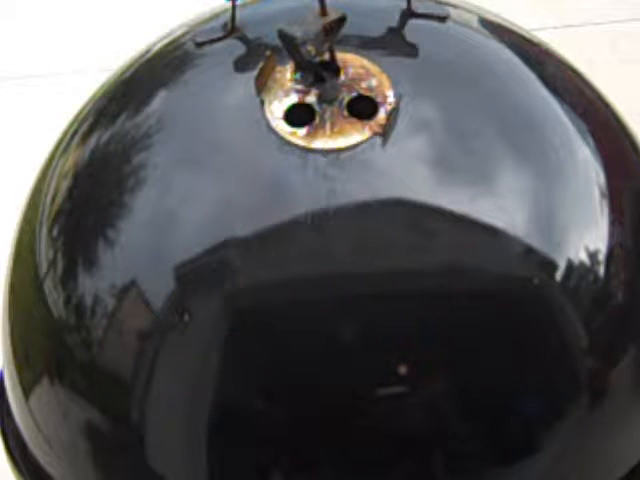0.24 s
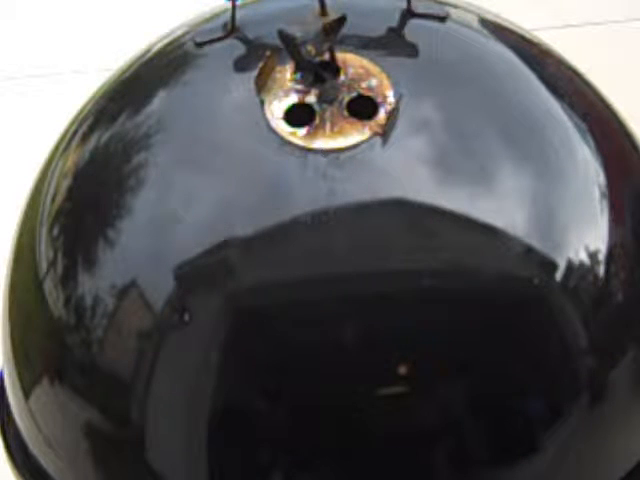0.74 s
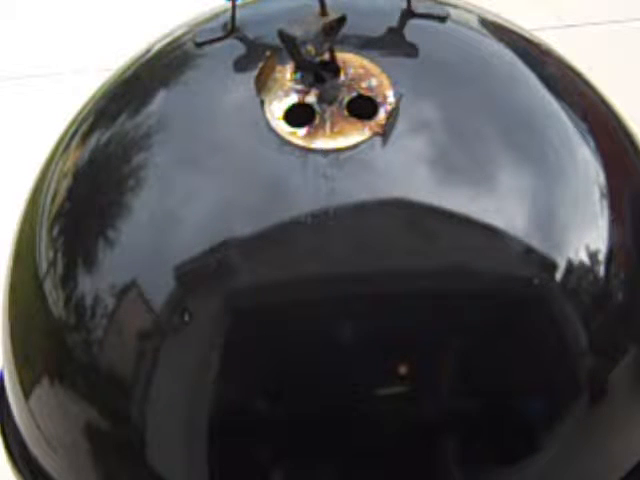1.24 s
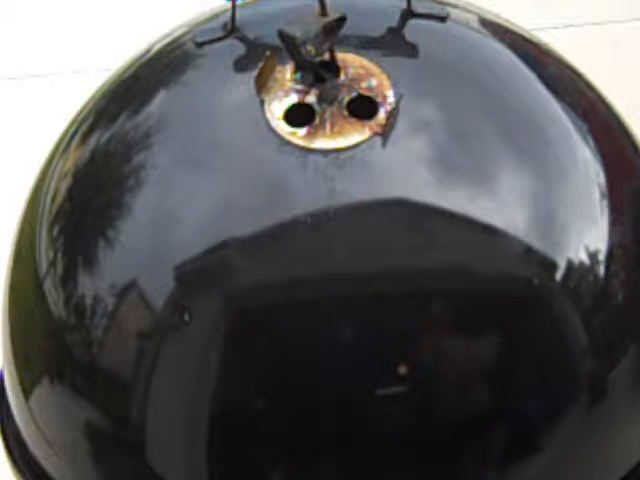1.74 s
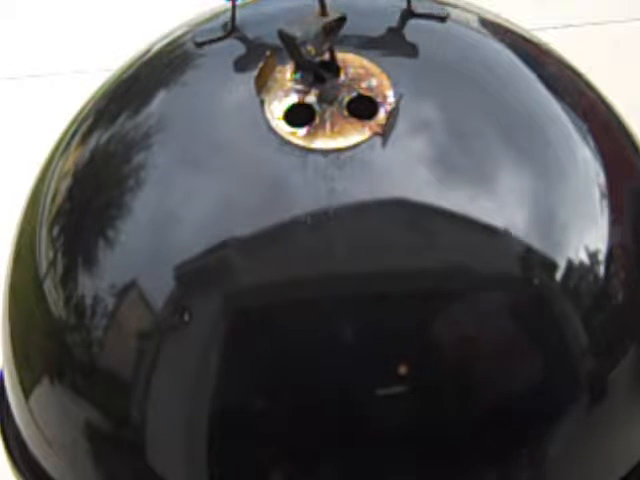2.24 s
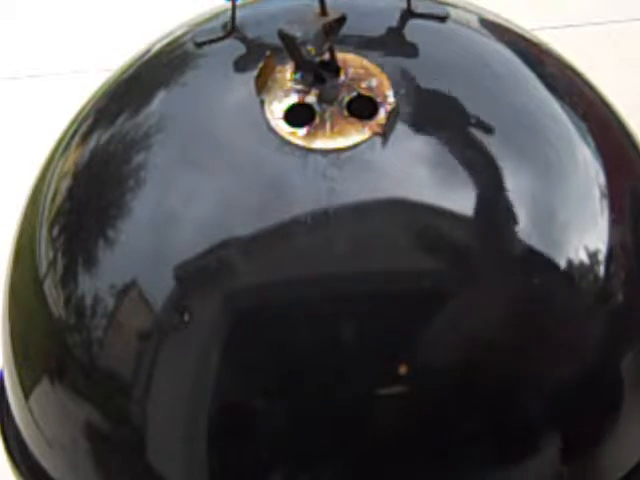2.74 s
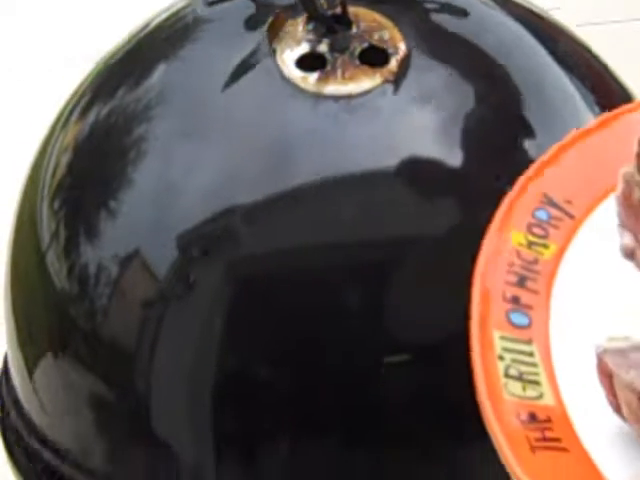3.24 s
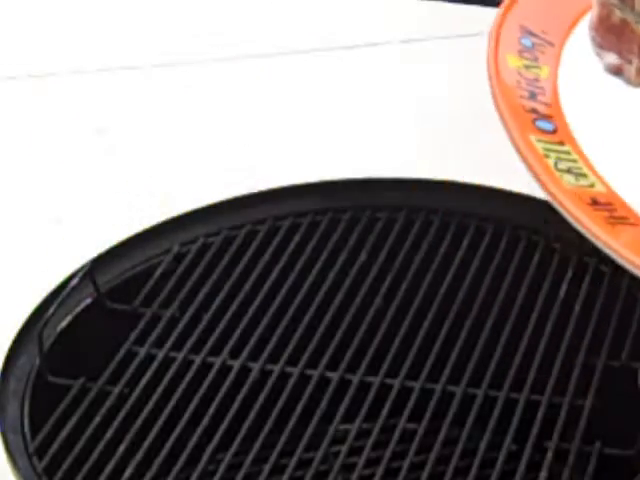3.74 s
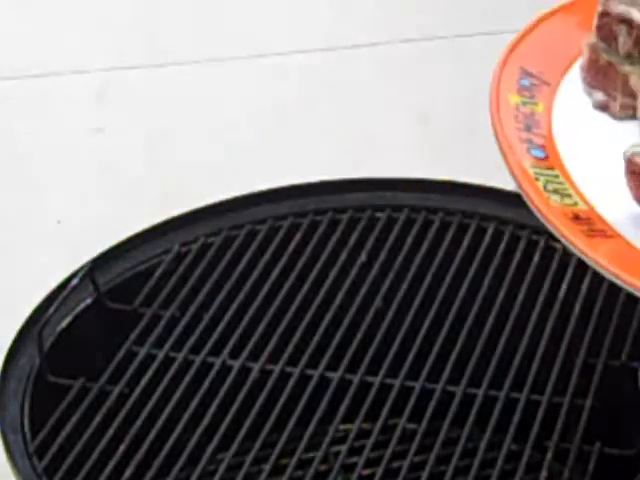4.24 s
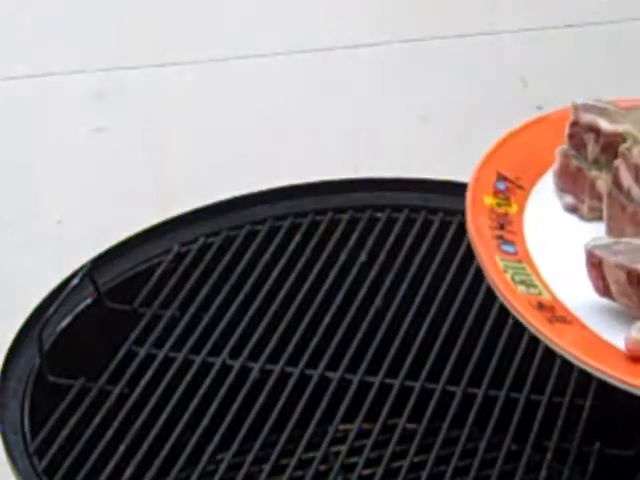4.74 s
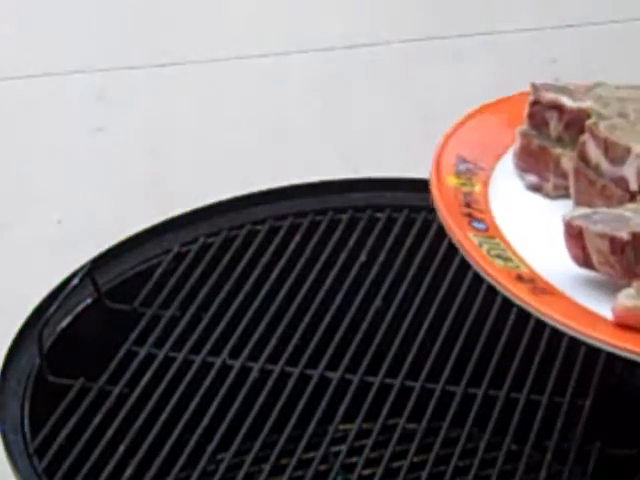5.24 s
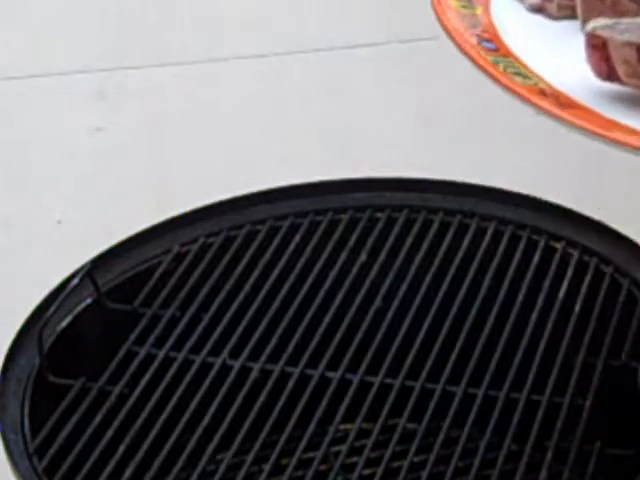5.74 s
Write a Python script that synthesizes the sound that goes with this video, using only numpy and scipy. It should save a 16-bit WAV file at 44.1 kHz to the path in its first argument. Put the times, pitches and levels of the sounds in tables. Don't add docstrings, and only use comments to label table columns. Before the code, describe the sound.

Outdoors by a kettle grill, steel tongs rattle sharply, the lid drags off and crashes on concrete, then tongs clink on a plate.

```python
import sys
import numpy as np
from scipy import signal
from scipy.fft import rfft, irfft
from scipy.io import wavfile
from scipy.ndimage import map_coordinates

SR = 44100
rng = np.random.default_rng(int(sys.argv[2]) if len(sys.argv) > 2 else 0)


def level_to_linear(level):
    exponent = np.asarray(level, float) / 20
    return 10 ** exponent


def digitize_waveform(pressure):
    field = np.atleast_2d(pressure).T
    bounded = np.clip(field, -1, 1)
    quanta = np.round(bounded * 32767).astype(np.int16)
    wavfile.write(sys.argv[1], SR, quanta)


N = 264159
CONTROL_STEP = 40

# t/s, level/dB
TRAFFIC_LEVEL = [(0.0, -46), (1.27, -47.5), (1.63, -43), (2.12, -48), (3.22, -45.5), (3.8, -43.5),
                 (3.97, -46.5), (4.17, -45), (4.37, -44), (5.07, -43.5), (5.57, -45.5), (5.99, -43)]
# f/Hz, level/dB
RUMBLE_SPECTRUM = [(12, -47), (20, -10), (59, 0.5), (120, 2), (185, -6.5), (238, -6.5), (367, -6.5),
                   (447, -33), (489, -17), (783, -21), (1250, -46), (1370, -33), (1500, -8.5),
                   (1950, -40.5), (3300, -120)]
# f/Hz, level/dB
HISS_SPECTRUM = [(290, -0.5), (500, 3), (737, 0.5), (987, 3), (1070, -3.5), (1380, -4), (3300, -7.5),
                 (5100, -12), (6500, -9.5), (8240, -10.5), (12000, -37), (12800, -35), (13800, -68)]
# f/Hz, likeness/1
AIR_LIKENESS = [(60, 0.99), (150, 0.98), (360, 0.97), (890, 0.89), (2200, 0.6), (5410, 0.51), (13300, 0.24)]
HISS_DB, HISS_TRAFFIC_SHARE = -49.5, -0.18
PASSING_S, PASSING_SPAN_S, PASSING_HZ, PASSING_OCTAVES, PASSING_DB = 4.4, 0.38, 246, 0.46, 7

# t/s, left-right level/dB, left lag/samples
POSITION = [(0, -5, 6.2), (1.0, -3.5, 4.34), (1.72, -5.5, 5.3), (1.78, -6.5, 0.16), (2.1, -0.5, 0.12),
            (2.3, 0, 0.59), (3.2, 2, 0.5), (3.9, -1, 1.7), (4.9, 0.3, 1.15), (5.4, 0, 0.69),
            (5.99, 1, 0.73)]
# f/Hz, level/dB
RIGHT_PORT_RESPONSE = [(20, 0), (7000, 0.5), (8000, -1), (8600, -9), (10000, -7.5), (12000, -13),
                       (14000, -15)]
YARD_DB, YARD_T60_S = -11.5, 0.16
OVERLOAD_PEAK = 0.65

# t/s of peak, peak level/dB, rise/s, fall/s, brightness/(dB per octave)
SCUFF_STROKES = [(0.429, -35.5, 0.066, 0.23, 0), (0.693, -31.5, 0.029, 0.18, 1.5),
                 (2.72, -51.5, 0.19, 0.29, 6), (3.155, -38, 0.011, 0.03, 5), (3.241, -49, 0.11, 0.1, 3),
                 (3.73, -38, 0.059, 0.6, 3), (3.906, -27, 0.1, 0.14, 3), (3.965, -26, 0.18, 0.073, 1),
                 (4.02, -48.5, 0.018, 0.08, -20), (4.6, -57, .35, .3, 5), (5.324, -47, 0.33, 0.13, 9),
                 (0.395, -49, 0.0055, .05, 4), (0.42, -38, .006, .03, 5.5), (0.6, -41, 0.081, .1, -0.5)]
# f/Hz, level/dB
SCUFF_SPECTRUM = [(290, -52), (500, -16), (558, -13), (700, -4.5), (1550, -6), (2120, -1), (2430, -5.5),
                  (3510, -3), (4870, -6.5), (6940, -5.5), (10600, -7), (11800, -24), (13000, -96)]
STROKE_DROP_DB, RISE_BEND, FALL_BEND = 29.5, 1.43, 1.77

# t/s, peak level/dB, f/Hz, t60/s
LOOSE_POPS = [
    (1.2, -18.5, 720, 0.003),
    (2.6, -34, 776, 0.011),
    (4.9468, -35, 3560, 0.044),
    (4.964, -33, 820, 0.089),
    (5.008, -33, 550, .08),
    (5.047, -26, 4000, .04),
    (3.9225, -18, 3600, 0.017),
    (4.9745, -20, 310, 0.051),
    (5.056, -37, 550, 0.22),
    (5.052, -35, 190, 0.17),
]
# t/s, peak level/dB, f/Hz, t60/s
CONTACT_PINGS = [(0.6845, -27, 4450, 0.057), (0.6845, -27, 2450, .05), (0.6845, -29.5, 6950, 0.074),
                 (1.792, -45, 3000, .1), (1.828, -39, 3730, .15), (1.85, -38, 5420, .2),
                 (1.868, -34, 4900, .05), (1.9732, -15, 8200, .006), (1.9785, -17, 7900, .006),
                 (4.4066, -38, 2500, 0.017), (5.581, -35, 4290, 0.035), (5.6398, -38.5, 7020, 0.34),
                 (5.6398, -23, 8200, .025), (5.6555, -35, 5600, .05), (5.8085, -32, 8700, 0.091),
                 (5.944, -34, 7300, 0.15)]

# t/s, peak level/dB, upper ring f/Hz, lower ring f/Hz, t60/s
PLATE_KNOCKS = [
    (0.676, -27, 4900, 2420, 0.11),
    (0.685, -16.5, 6840, 2350, 0.072),
    (2.674, -34.5, 4450, 3260, 0.019),
    (3.6822, -37, 6500, 5230, 0.022),
    (3.715, -29, 7050, 2900, 0.016),
    (3.8071, -14, 4950, 3170, 0.024),
    (4.4068, -31, 8300, 2470, 0.032),
]
# f/Hz, level/dB
KNOCK_CRACK_SPECTRUM = [(350, -47), (600, -67), (1320, 9), (2140, -52), (2380, 11), (4500, -1),
                        (7060, 13.5), (10200, 1.5), (12400, -32), (13800, -82)]
# f/Hz, level/dB, t60/s
PLATE_MODES = [(1364, 5.5, 0.15), (1680, 1.5, 0.15), (1920, 5, 0.15), (2010, -24, .1), (2420, -7, 0.17),
               (3145, 6.5, 0.07), (2800, -29, 0.1), (3950, -8, .15), (4450, -7, 0.05), (5100, -33, .27),
               (5800, -25, .24), (6400, -15, .41), (7050, -22, .4), (7860, -29, .5), (9100, -18, .2)]
# f/Hz, level/dB, t60/s
SINGING_MODES = [(6870, -50, .5), (6940, -40, 0.49), (8000, -41.5, 0.57), (4430, -23.5, 0.062),
                 (4000, -46, 0.45), (2400, -31, .1), (5250, -42, .3), (5700, -47, .25), (9290, -37, .25),
                 (3200, -48, .3)]
# t/s, peak level/dB
KETTLE_RIM_TICKS = [(3.701, -32), (3.7274, -36), (3.739, -35), (3.746, -35), (3.7744, -29), (3.800, -28),
                    (3.9553, -21)]
SINGING_START_S, KNOCK_CHATTER_SHARE = 0.686, 0.047
RIM_UPPER_HZ, RIM_LOWER_HZ, RIM_T60_S = 7300, 3300, 0.018

# t/s, level/dB
DRAG_LEVEL = [(3.84, -60), (3.875, -39), (3.895, -27), (3.93, -25.5), (3.97, -32), (3.995, -41),
              (4.04, -70)]
# f/Hz, width/Hz, level/dB
DRAG_RESONANCES = [(2146, 44, -0.5), (2660, 24, -0.5), (3050, 130, -3.5), (3500, 54, -1), (3800, 130, -5),
                   (4090, 62, -5), (4600, 92, -10), (5200, 130, -7), (5720, 100, -5), (6900, 120, -6.5),
                   (7300, 82, -8), (7900, 120, -5)]
# t/s, ring level/dB, thud level/dB, wash level/dB
LID_STRIKES = [
    (4.9465, -56, -15, -26.5),
    (4.9638, -56, -27, -25),
    (4.972, -22, -19.5, -15.5),
    (4.9988, -35.5, -32, -38),
    (5.051, -50, -40, -48),
]
# f/Hz, level/dB, t60/s
LID_THUD_MODES = [(134, -6.5, 0.2), (166, -6, 0.094), (197, -13, 0.23), (266, 0, 0.048), (327, -4, 0.063),
                  (440, -24, 0.07), (547, -24, 0.15), (556, -3.5, 0.082), (720, -25, 0.072),
                  (1000, -24, .08), (415, -7, 0.11), (818, -18, 0.096)]
# f/Hz, level/dB, t60/s
LID_RING_MODES = [(3530, 16, 0.056), (3716, 15.5, 0.078), (3700, -20, 0.13), (3850, 6.5, 0.18),
                  (3676, -12, 0.86), (4064, -8.5, 1.2), (4200, -10.5, 1.1), (4380, -20, .9),
                  (4700, -14, 0.63), (5040, -22, 0.88), (5260, -11, 0.41), (5960, -14, 1.1),
                  (6100, -24, 0.53), (6400, -12.5, 1.25), (6680, -24, 0.48), (7050, -18, 0.33),
                  (7569, -32, 0.67), (8060, -10, 0.21), (8460, 1, 0.23), (8850, -14, 0.34),
                  (9873, -3, 0.26), (11600, -22, 0.065)]
# f/Hz, level/dB
LID_WASH_SPECTRUM = [(530, -21), (900, -8), (1040, -21), (1170, -14.5), (2000, -11.5), (2950, -13),
                     (3310, -6), (3620, -4), (4300, 5), (4900, -13), (8050, 2.5), (9450, -5.5),
                     (13000, -5.5), (13800, -68)]
# f/Hz, t60/s
LID_WASH_DECAY = [(1000, 0.67), (2700, 0.074), (3300, 0.25), (3600, 0.69), (4200, 1.74), (4700, 1.24),
                  (7500, 0.78), (10000, 0.14), (13000, 0.21)]
PUSH_DB, PUSH_HZ, PUSH_SAG_PER_S, PUSH_T60_S = -7.5, 384, 155, 0.04

# f/Hz, level/dB, t60/s
TONG_MODES = [(3200, -10, 0.24), (3660, -6, 0.15), (4010, -3, 0.19), (4900, -35, 0.13), (5600, -46, 0.17),
              (5940, -45, 0.16), (6340, -27, .2), (6750, 3, 0.13), (6900, -24, 0.15), (7100, -31, .2),
              (7140, -69, .15), (8320, -17, .17), (8350, 12, .12), (7680, 13, .15), (6800, 8, .15),
              (8690, 14, 0.085), (9700, -1, .2), (9300, -17, .13), (9200, -48, .1), (9800, -7, 0.12),
              (10300, -30, .08), (10700, 4, .08), (10460, -29, 0.054), (11800, 3.5, 0.062), (12700, 6, 0.1)]
# f/Hz, level/dB
TONG_CRACK_SPECTRUM = [(880, -59), (1500, -77), (2720, -93), (3590, -11), (5760, 1), (6380, -5),
                       (7680, 6.5), (9500, -6), (12900, -12), (13800, -45)]
# t/s, peak level/dB, upper ring f/Hz, lower ring f/Hz, t60/s
HAND_CONTACTS = [(1.657, -6, 9000, 5200, 0.022), (1.687, -22, 7600, 6350, 0.024),
                 (1.698, -20.5, 7050, 8200, 0.04), (1.792, -18.5, 8800, 6360, 0.035),
                 (1.802, -21, 7730, 6700, 0.049), (1.8252, -17, 8350, 7690, 0.04),
                 (1.8283, -13.5, 7680, 6440, 0.057), (1.841, -32, 7690, 5430, 0.058),
                 (1.8683, -12, 10300, 8330, 0.07), (1.883, -22, 8450, 5520, 0.081),
                 (1.905, -22, 6900, 5430, 0.06), (1.9264, -26, 9450, 6480, 0.076),
                 (1.946, -30, 6760, 5600, .08), (1.958, -20, 8540, 6440, 0.11),
                 (1.9645, -12, 7900, 6670, 0.05), (1.9688, -15, 7560, 6400, 0.025),
                 (1.971, -5, 6600, 9300, 0.027), (1.9728, -7.5, 8200, 6500, .015),
                 (1.9779, -10, 7900, 9600, 0.024), (1.986, -20, 8000, 6900, .05),
                 (1.994, -14.5, 7900, 6900, 0.047), (2.106, -28, 7050, 5700, 0.021),
                 (2.196, -24, 9100, 6500, 0.047), (2.202, -23, 9000, 6500, 0.026),
                 (2.2273, -19, 8830, 6900, 0.049)]
# t/s, peak level/dB, upper ring f/Hz, lower ring f/Hz, t60/s
PLATE_CONTACTS = [(5.5003, -32, 7600, 6650, 0.099), (5.5656, -19, 7670, 7540, 0.062),
                  (5.577, -18, 7850, 6500, .03), (5.581, -14, 7300, 4300, 0.046),
                  (5.590, -34, 7360, 5900, 0.045), (5.5995, -13.5, 7860, 6500, 0.055),
                  (5.608, -30, 7860, 5850, 0.05), (5.634, -30, 7700, 6900, .03),
                  (5.6396, -16, 7800, 6900, 0.074), (5.6555, -20.5, 6450, 5700, 0.036),
                  (5.664, -27, 10100, 6500, 0.035), (5.6907, -37, 7200, 6900, 0.13),
                  (5.735, -35, 7240, 7060, 0.055), (5.7435, -22.5, 7950, 6900, 0.063),
                  (5.760, -30, 7740, 6500, .07), (5.7788, -25.5, 7860, 6950, 0.047),
                  (5.8084, -23, 7100, 6100, 0.078), (5.8165, -23.5, 8610, 6400, 0.048),
                  (5.8521, -33, 7250, 6700, 0.071), (5.8756, -29, 7870, 7300, 0.056),
                  (5.8855, -19, 7900, 5800, 0.073), (5.891, -19, 7700, 6500, 0.045),
                  (5.902, -35, 7760, 6500, 0.054), (5.944, -24.5, 7270, 6840, 0.084),
                  (5.955, -38, 7360, 8610, .07)]
# t/s, peak level/dB, upper ring f/Hz, lower ring f/Hz
CARRIED_TICKS = [(2.7871, -36.5, 7700, 6400), (3.0796, -38, 7600, 6400), (4.235, -40, 10840, 8000),
                 (4.26, -33, 10900, 9600), (4.4676, -32.5, 8200, 6400), (4.8913, -33.5, 7600, 6400),
                 (5.29, -28, 8200, 7200), (5.324, -27.5, 6900, 5280), (3.121, -46, 8600, 7600),
                 (5.372, -33, 7900, 7200), (5.472, -34, 7600, 6400)]
# t/s, level/dB
BUZZ_LEVEL = [(1.788, -70), (1.793, -31.5), (1.82, -34.5), (1.835, -24), (1.862, -42), (1.91, -28),
              (1.955, -40.5), (1.985, -25), (2.06, -63), (2.16, -51)]
# f/Hz, width/Hz, level/dB
BUZZ_RESONANCES = [(3640, 91, -16.5), (5430, 230, -14.5), (6100, 88, -14), (6900, 100, -9), (7690, 55, -2),
                   (8330, 34, -4), (8600, 110, -7), (9000, 66, -9), (9400, 47, 0), (9900, 51, -10),
                   (10300, 120, -8), (11170, 83, -9.5), (11700, 68, -13), (12760, 59, -4)]
# t/s, level/dB
BRUSH_LEVEL = [(3.144, -70), (3.147, -32), (3.151, -33), (3.155, -32), (3.167, -39), (3.174, -62),
               (3.19, -65)]
# f/Hz, width/Hz, level/dB
BRUSH_RESONANCES = [(2900, 150, -11.5), (3680, 68, -8), (4530, 150, -4), (5600, 120, -10),
                    (6600, 110, -3.5), (7500, 150, -3), (8300, 120, 1), (8900, 170, 2), (10800, 250, -13)]
# t/s, level/dB
TRAIL_LEVEL = [(3.17, -67), (3.2, -53), (3.24, -46.5), (3.275, -62), (3.31, -53), (3.35, -62)]
# f/Hz, width/Hz, level/dB
TRAIL_RESONANCES = [(3700, 150, -3), (4300, 300, -10), (6300, 300, -6), (7300, 300, -3), (8200, 300, 0),
                    (9000, 300, -5)]
CARRIED_T60_S, HAND_CHATTER_S, PLATE_CHATTER_S = 0.051, 0.0025, 0.001
SHIMMER_T60_S, CONTACT_RISE_S = 0.72, 0.00015
TOUCHES_PER_S, TOUCH_UNEVEN_DB, BROAD_SCRAPE_DB = 1100, 2.5, -10


def at_hz(points, hz):
    table_hz, values = np.transpose(points)
    return np.interp(np.log(hz), np.log(table_hz), values)


def in_time(rows, silent):
    s, *columns = np.transpose(rows)
    return [np.interp(np.arange(N) / SR, s, c, silent, silent) for c in columns]


def rms_one(x):
    return x / np.sqrt(np.mean(x ** 2) + 1e-20)


def drift(rate_hz):
    r = np.exp(-2 * np.pi * CONTROL_STEP * rate_hz / SR)
    noise = rng.standard_normal(N // CONTROL_STEP + 2002)
    return rms_one(signal.lfilter([1], [1, -2 * r, r * r], noise)[2000:])


def fine(slow):
    return np.interp(np.arange(N) / CONTROL_STEP, np.arange(len(slow)), slow)


def panned(x, pan_db):
    return x * level_to_linear(np.array([pan_db / 2, -pan_db / 2]).reshape(2, -1))


def add(out, s, sound):
    i = round(s * SR)
    out[:, i:i + sound.shape[1]] += sound[:, :N - i]


def thinned(x, low_hz):
    return signal.sosfilt(signal.butter(4, low_hz, "high", fs=SR, output="sos"), x)


def dulled(x, top_hz):
    return signal.sosfilt(signal.butter(6, top_hz, fs=SR, output="sos"), x)


def bands(sources, spectrum, likeness, shape):
    lowest_hz, highest_hz = np.array(spectrum)[[0, -1], 0]
    edges = lowest_hz * 2 ** np.arange(0, np.log2(highest_hz / lowest_hz), 1 / 3)
    out = 0
    for k, (low, high) in enumerate(zip(edges, edges[1:])):
        band = signal.butter(2, [low, high], "band", fs=SR, output="sos")
        mid, side = signal.sosfilt(band, sources[k % 2])
        hz = np.sqrt(low * high)
        alike = np.clip(likeness(hz), 0, 1)
        pair = np.sqrt(1 + alike) * mid + np.sqrt(1 - alike) * side * [[1], [-1]]
        out = out + level_to_linear(at_hz(spectrum, hz)) * shape(hz) * pair
    return out


def ringing(modes, t, spread_db, lag_rad):
    hz, db, t60 = np.float32(np.transpose(modes)[:, :, None])
    t = np.float32(t)
    strength, phase = np.float32(rng.standard_normal((2, len(modes), 1)))
    decay = np.exp(-np.float32(np.log(1000)) * t / np.clip(t60, 0.005, 1.5))
    height = np.float32(level_to_linear(db + spread_db * strength)) * decay
    angle = np.float32(2 * np.pi) * hz * t
    return np.array([np.sum(height * np.sin(angle + np.float32(side * lag_rad) * phase), axis=0)
                     for side in (1, -1)])


def air():
    rumble_db, = in_time(TRAFFIC_LEVEL, None)
    hiss_db = HISS_DB + HISS_TRAFFIC_SHARE * (rumble_db - rumble_db.mean())
    together = drift(11.0)
    slow_s = np.arange(len(together)) * CONTROL_STEP / SR
    passing_db = PASSING_DB * np.exp(-((slow_s - PASSING_S) / PASSING_SPAN_S) ** 2)

    def alike(hz):
        return at_hz(AIR_LIKENESS, hz)

    def rumble_gain(hz):
        near_drone = np.exp(-(np.log2(hz / PASSING_HZ) / PASSING_OCTAVES) ** 2)
        return fine(level_to_linear(0.074 * together + 2.86 * drift(2.0) + passing_db * near_drone))

    def hiss_gain(hz):
        return fine(level_to_linear(0.091 * together + 0.54 * drift(24) + 0.64 * drift(0.91)))

    rumble = bands(rng.standard_normal((2, 2, N)), RUMBLE_SPECTRUM, alike, rumble_gain)
    hiss = bands(rng.standard_normal((2, 2, N)), HISS_SPECTRUM, alike, hiss_gain)
    return panned(level_to_linear(rumble_db) * rms_one(rumble), -0.27) + panned(level_to_linear(hiss_db) * rms_one(hiss), -0.24)


def yard(x):
    t = np.arange(SR // 4) / SR
    tail = rng.standard_normal((2, len(t))) * level_to_linear(-60 * t / YARD_T60_S) * (t > 0.004)
    tail = level_to_linear(YARD_DB) * tail / np.sqrt(np.sum(tail ** 2, axis=1, keepdims=True))
    tail = signal.sosfilt(signal.butter(2, 1500, "high", fs=SR, output="sos"), tail)
    return signal.fftconvolve(x, tail, axes=1)[:, :N]


def placed(x):
    pan_db, lag = in_time(POSITION, None)
    left = map_coordinates(x[0], [np.arange(N) - lag], order=3)
    return panned(np.array([left, x[1]]), pan_db)


def strokes():
    s, db, rise, fall, bright = np.transpose(SCUFF_STROKES)[:, :, None]
    late = np.arange(N // CONTROL_STEP + 2) * CONTROL_STEP / SR - s
    loss = np.maximum(-late / rise, 0) ** RISE_BEND + np.maximum(late / fall, 0) ** FALL_BEND
    power = level_to_linear(db - np.minimum(STROKE_DROP_DB * loss, 100)) ** 2
    total = power.sum(axis=0)
    return np.sqrt(total), (power * bright).sum(axis=0) / total


def scuffs():
    gain, bright_db = strokes()
    clicks = rng.random(N) < 4000 / SR
    grit = level_to_linear(2.9 * np.minimum(rng.exponential(1, N), 4)) * clicks
    sources = rng.standard_normal((2, 2, N)) * (grit + 1.2)
    rough = drift(57)

    def colour(hz):
        return fine(level_to_linear(bright_db * np.log2(hz / 4000) + 1.2 * rough + 1.6 * drift(30)))

    return fine(gain) * rms_one(bands(sources, SCUFF_SPECTRUM, lambda hz: 0.9, colour))


def pops(rows):
    out, t = np.zeros((2, N)), np.arange(SR // 5) / SR
    for s, db, hz, t60 in rows:
        decay = level_to_linear(db - 60 * t / max(t60, 0.001) + np.zeros((2, 1)))
        add(out, s, -decay * np.sin(2 * np.pi * hz * t))
    return out


def plate_singing():
    out, t = np.zeros((2, N)), np.arange(SR // 2) / SR
    add(out, SINGING_START_S, ringing(SINGING_MODES, t, spread_db=0.1, lag_rad=0.3))
    return out


def lid_puff():
    out, t = np.zeros((2, N)), np.arange(SR // 2) / SR
    turns = PUSH_HZ * np.log(1 + PUSH_SAG_PER_S * t) / PUSH_SAG_PER_S
    decay = level_to_linear(PUSH_DB - 60 * t / PUSH_T60_S + np.zeros((2, 1)))
    puff = decay * np.sin(2 * np.pi * turns) * (1 - np.exp(-t / 0.0015))
    add(out, LID_STRIKES[0][0] - 0.0012, puff)
    return out


def lid():
    out, t = np.zeros((2, N)), np.arange(SR * 3 // 5) / SR
    cluster = [(hz * (1 + 0.013 * step), db, t60) for hz, db, t60 in LID_RING_MODES
               for step in rng.standard_normal(5)]

    def wash_decay(hz):
        slow = 0.17 * level_to_linear(-60 * t / max(at_hz(LID_WASH_DECAY, hz), 0.01))
        return slow + level_to_linear(-60 * t / 0.053)

    for s, ring_db, thud_db, wash_db in LID_STRIKES:
        rings = level_to_linear(ring_db - 12) * ringing(cluster, t, spread_db=4.0, lag_rad=0.4)
        thud = level_to_linear(thud_db) * ringing(LID_THUD_MODES, t, spread_db=4.0, lag_rad=0.11)
        thud = thud * (1 - np.exp(-t / 0.0048))
        wash = bands(rng.standard_normal((2, 2, len(t))), LID_WASH_SPECTRUM, lambda hz: 0.9, wash_decay)
        wash = level_to_linear(wash_db) * wash / wash[:, :1000].std()
        rise = 1 - np.exp(-t / 0.0027)
        add(out, s, rise * (rings + wash) + thud)
    return out


def scrape(curve, resonances):
    level_db, = in_time(curve, -200)
    span = slice(round(curve[0][0] * SR), round(curve[-1][0] * SR))
    size = span.stop - span.start
    chance, strength = rng.random((2, SR // 2))[:, :size]
    noise = rng.standard_normal((2, SR // 2))[:, :size]
    touches = (chance < TOUCHES_PER_S / SR) * level_to_linear(-TOUCH_UNEVEN_DB * np.log(strength + 0.01))
    rings = 0
    for hz, width_hz, db in resonances:
        r, w = np.exp(-np.pi * max(width_hz, 5) / SR), 2 * np.pi * hz / SR
        common, apart = rng.standard_normal(SR // 2), rng.standard_normal((2, SR // 2))
        strikes = touches * (common + 0.42 * apart)[:, :size]
        ring = signal.lfilter([0, 1], [1, -2 * r * np.cos(w), r * r], strikes)
        rings = rings + level_to_linear(db) * np.sqrt(width_hz) * rms_one(ring)
    bright = signal.butter(2, [5600, 10500], "band", fs=SR, output="sos")
    broad = signal.sosfilt(bright, noise * (touches + 0.24))
    out = np.zeros((2, N))
    out[:, span] = level_to_linear(level_db[span]) * (rms_one(rings) + level_to_linear(BROAD_SCRAPE_DB) * rms_one(broad))
    return out


def clinks(events, modes, crack, crack_db, tick_db, upper_db, lower_db, ring_share, shimmer_db):
    out, t = np.zeros((2, N)), np.arange(SR // 3) / SR
    noise = rms_one(bands(rng.standard_normal((2, 2, 2 * SR)), crack, lambda hz: 0.9, lambda hz: 1))
    for s, db, upper_hz, lower_hz, t60, chatter in events:
        t60, chatter = max(t60, 0.005), max(chatter, 1e-4)
        start = rng.integers(SR)
        damped = [(f, d, min(long, ring_share * t60)) for f, d, long in modes]
        damped += [(f * (1 + 0.018 * rng.standard_normal()), d - 3, long) for f, d, long in damped]
        gripped = [(hz * spread, d, t60) for hz, d in ((upper_hz, upper_db), (lower_hz, lower_db))
                   for spread in (0.975, 1, 1.018)]
        ring_s = min(0.8 * max(ring_share, 1) * t60, 0.17)
        body = ringing(damped + gripped, t[:round(SR * ring_s)], spread_db=4, lag_rad=0.35)
        touches = rng.standard_normal(SR // 30) ** 3 * (t[:SR // 30] < chatter)
        touches[0] = 3
        body = signal.fftconvolve(body, touches[None], axes=1)[:, :len(t)]
        body = np.pad(body, [(0, 0), (0, len(t) - body.shape[1])])
        burst = level_to_linear(crack_db - 60 * np.maximum(t - chatter, 0) / (1.2 * t60))
        burst = burst + level_to_linear(tick_db - 60 * t / 0.01)
        burst = burst + level_to_linear(shimmer_db - 60 * t / SHIMMER_T60_S)
        sound = body / np.abs(body).max() + burst * noise[:, start:start + len(t)]
        sound = sound * (1 - np.exp(-t / CONTACT_RISE_S))
        add(out, s, level_to_linear(db) * sound / np.abs(sound).max())
    return out


def knocks():
    rows = [(*row, KNOCK_CHATTER_SHARE * row[-1]) for row in PLATE_KNOCKS]
    rows += [(s, db, RIM_UPPER_HZ, RIM_LOWER_HZ, RIM_T60_S, KNOCK_CHATTER_SHARE * RIM_T60_S)
             for s, db in KETTLE_RIM_TICKS]
    out = 0
    for group, low_hz in ((rows[:2], 1350), (rows[2:], 2100)):
        struck = clinks(group, PLATE_MODES, KNOCK_CRACK_SPECTRUM, crack_db=-8, tick_db=-3,
                        upper_db=-5, lower_db=0, ring_share=1.6, shimmer_db=-45)
        out = out + thinned(struck, low_hz)
    return out


def tongs():
    hand_rows = [(*row, HAND_CHATTER_S) for row in HAND_CONTACTS]
    plate_rows = [(*row, PLATE_CHATTER_S) for row in PLATE_CONTACTS]
    plate_rows += [(*row, CARRIED_T60_S, PLATE_CHATTER_S) for row in CARRIED_TICKS]
    hand = clinks(hand_rows, TONG_MODES, TONG_CRACK_SPECTRUM, crack_db=-23, tick_db=-16.0,
                  upper_db=30.0, lower_db=23.5, ring_share=1.2, shimmer_db=-32.5)
    plate = clinks(plate_rows, TONG_MODES, TONG_CRACK_SPECTRUM, crack_db=-19, tick_db=-44,
                   upper_db=17.0, lower_db=9, ring_share=1.14, shimmer_db=-37.0)
    return thinned(thinned(hand, low_hz=3240), low_hz=2900) + thinned(plate, low_hz=3660)


def scene():
    far = dulled(air(), top_hz=13500) + pops(LOOSE_POPS)
    near = dulled(scuffs(), top_hz=8830) + pops(CONTACT_PINGS)
    near += knocks() + plate_singing()
    near += dulled(thinned(scrape(DRAG_LEVEL, DRAG_RESONANCES), low_hz=1610), top_hz=9100)
    near += lid_puff() + lid()
    near += thinned(scrape(BRUSH_LEVEL, BRUSH_RESONANCES), low_hz=2500)
    near += thinned(scrape(TRAIL_LEVEL, TRAIL_RESONANCES), low_hz=3000)
    near += thinned(scrape(BUZZ_LEVEL, BUZZ_RESONANCES), low_hz=3000)
    near += tongs()
    return placed(near) + yard(near) + far


def roll_off(x):
    return signal.sosfilt(signal.butter(12, 13920, fs=SR, output="sos"), x)


def record(dry):
    hz = np.maximum(np.arange(N // 2 + 1) * SR / N, 1)
    right = irfft(rfft(dry[1]) * level_to_linear(at_hz(RIGHT_PORT_RESPONSE, hz)), N)
    ports = signal.sosfilt(signal.butter(2, 45, "high", fs=SR, output="sos"), [dry[0], right])
    ports = OVERLOAD_PEAK * np.tanh(ports / OVERLOAD_PEAK)
    mix = signal.sosfilt(signal.cheby2(10, 60, 14200, fs=SR, output="sos"), ports)
    return roll_off(mix)


dry = scene()
out = record(dry)
digitize_waveform(out)
```